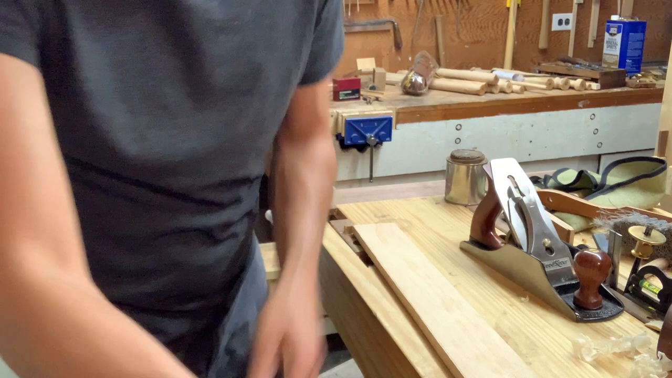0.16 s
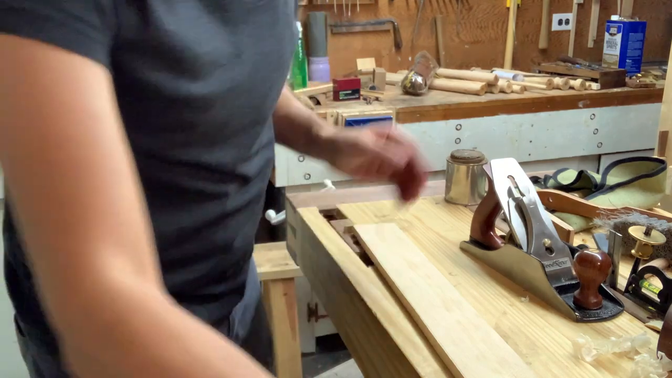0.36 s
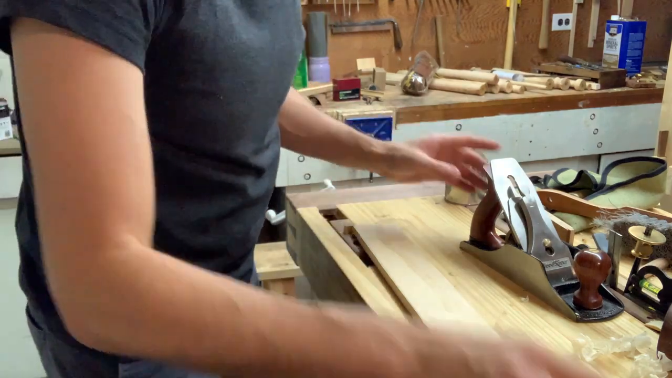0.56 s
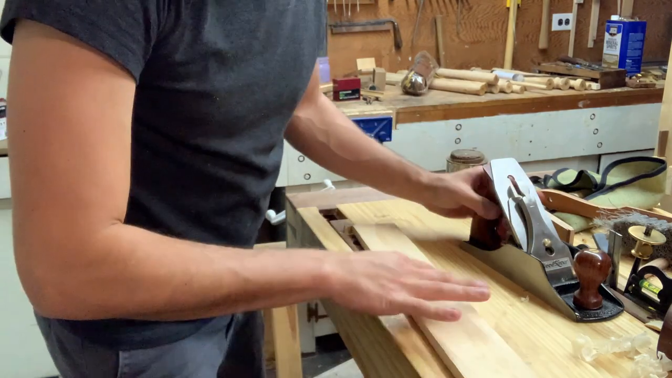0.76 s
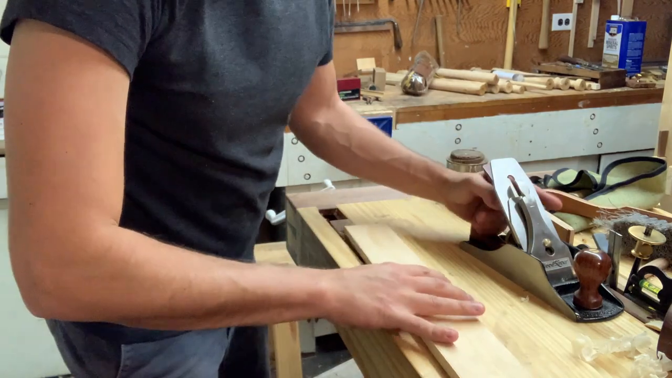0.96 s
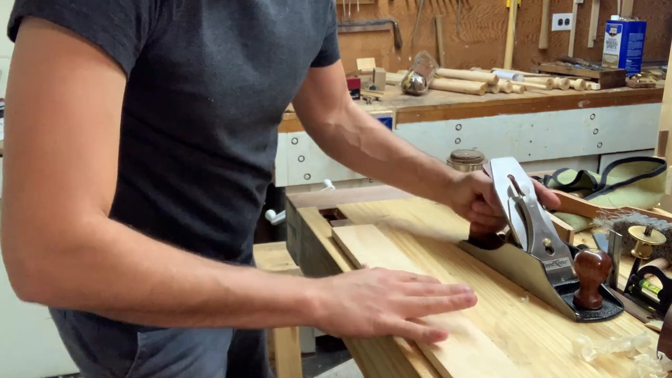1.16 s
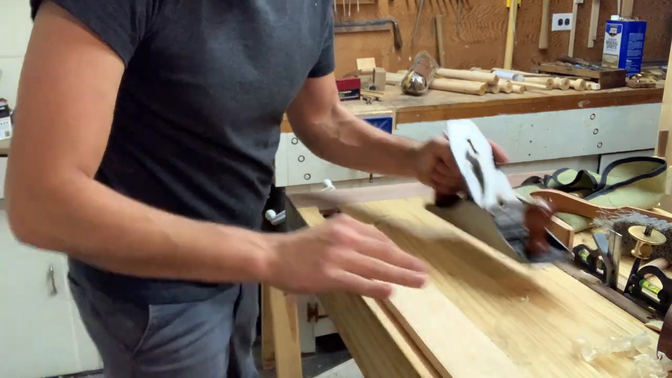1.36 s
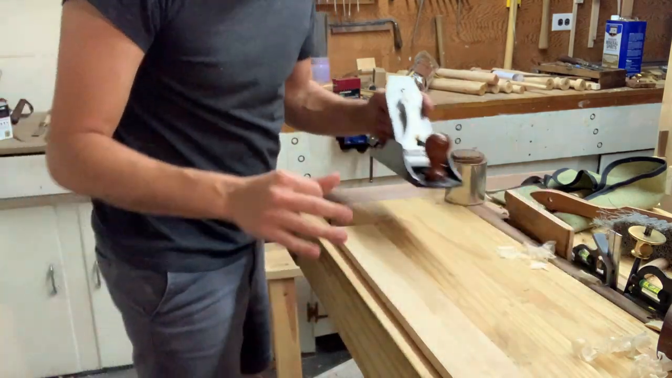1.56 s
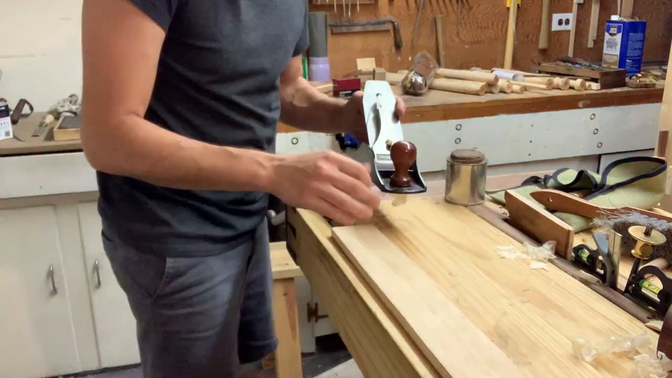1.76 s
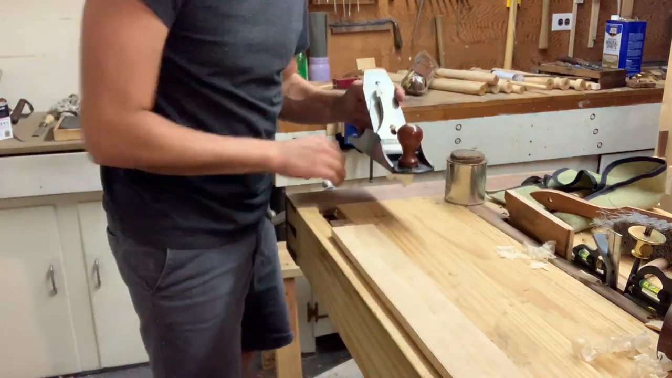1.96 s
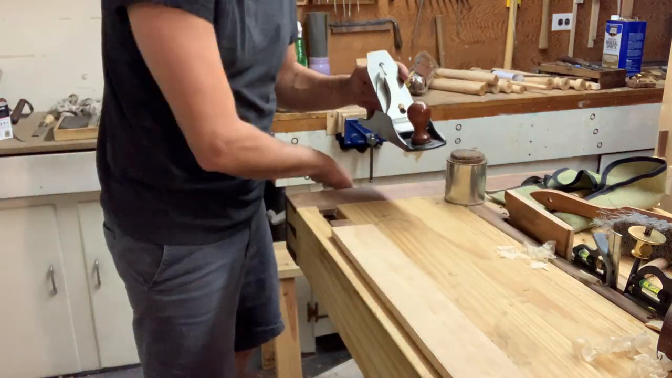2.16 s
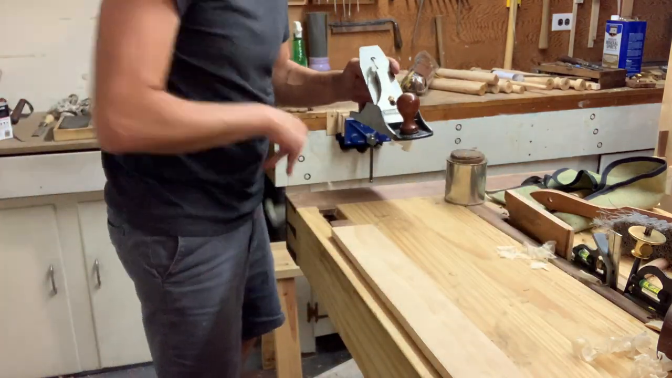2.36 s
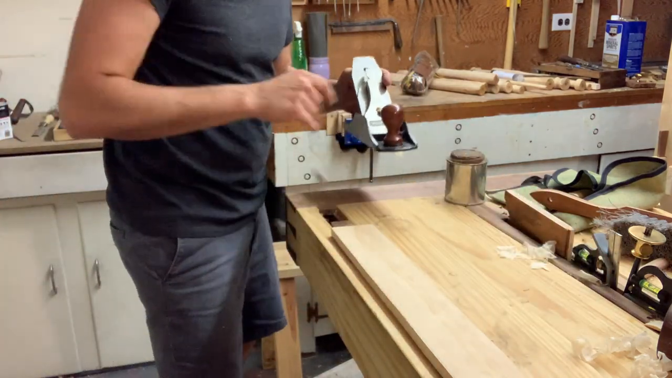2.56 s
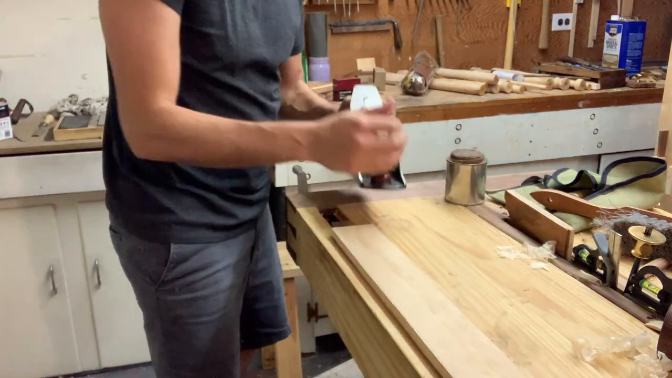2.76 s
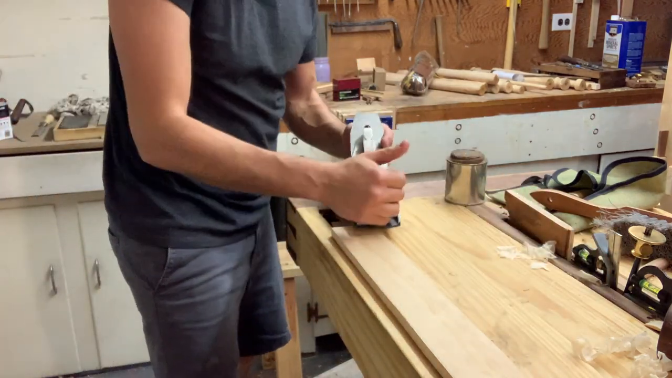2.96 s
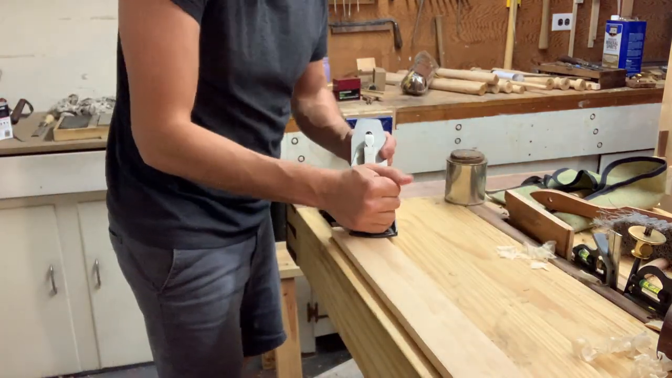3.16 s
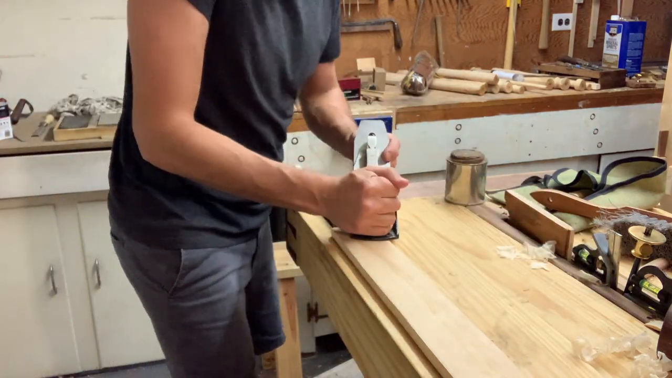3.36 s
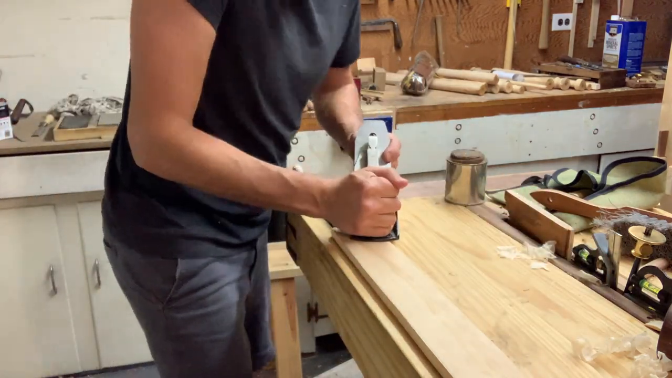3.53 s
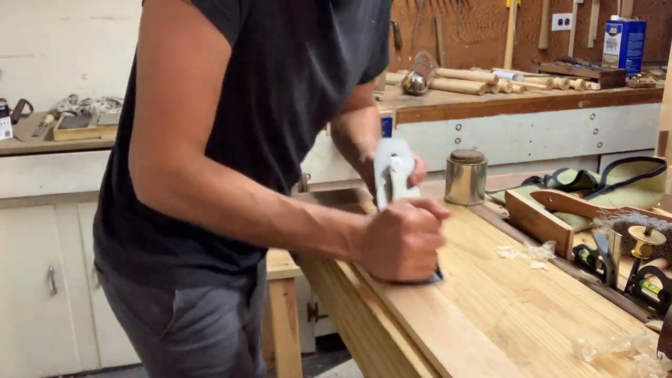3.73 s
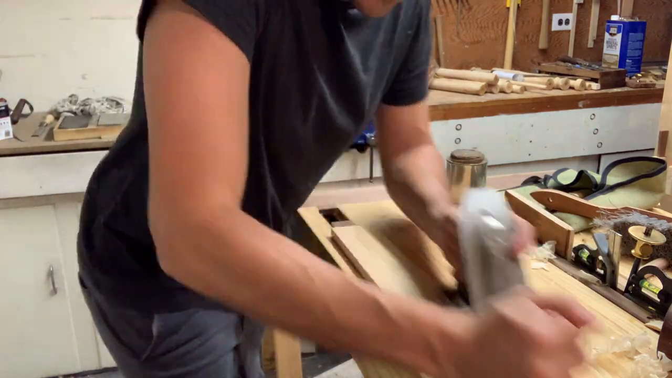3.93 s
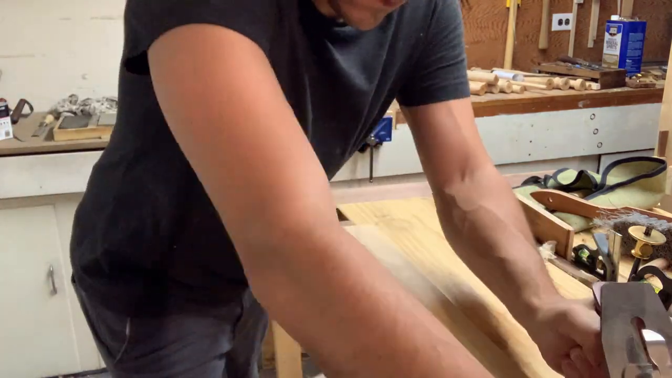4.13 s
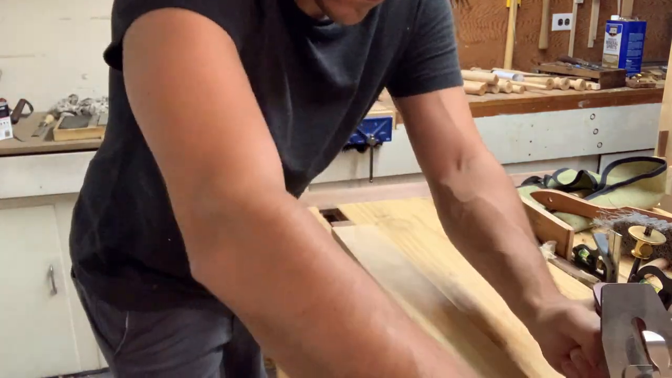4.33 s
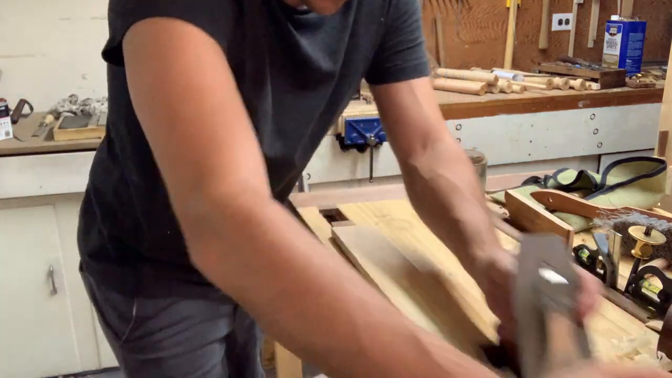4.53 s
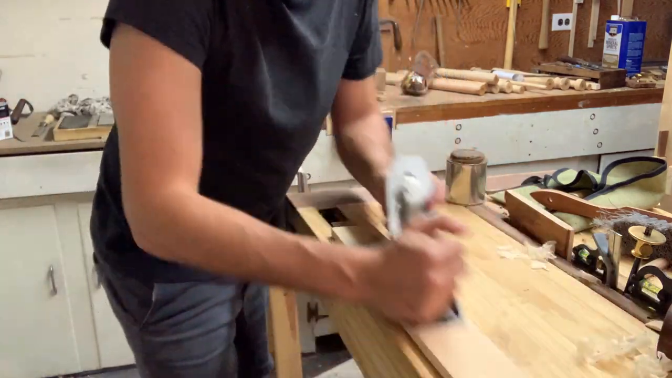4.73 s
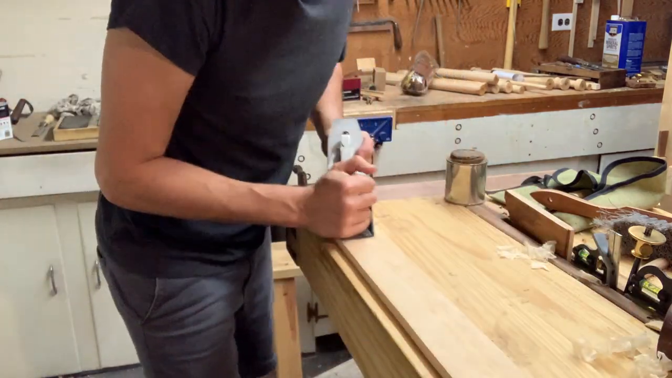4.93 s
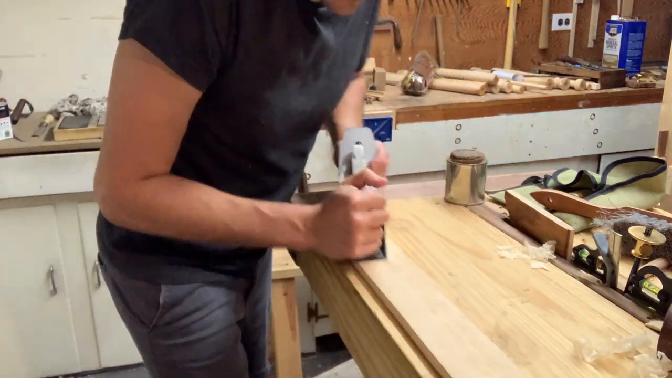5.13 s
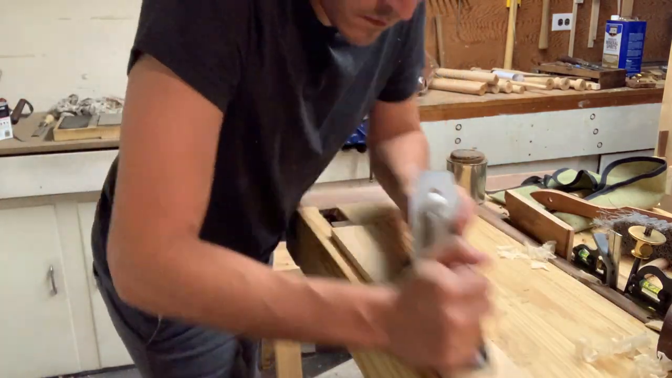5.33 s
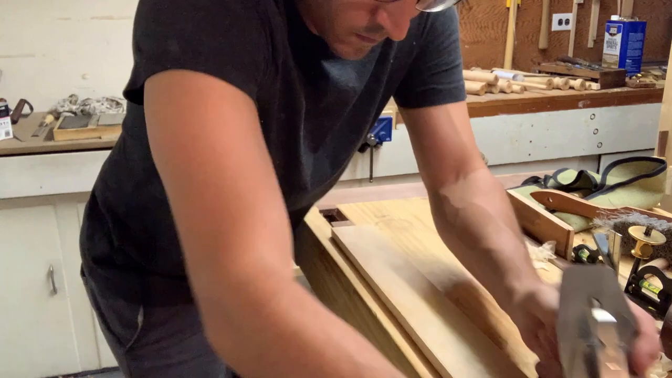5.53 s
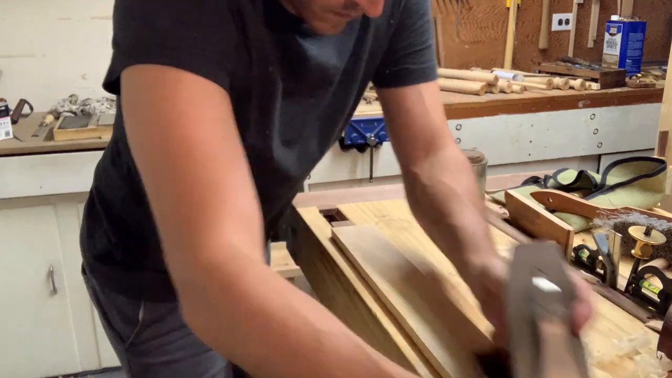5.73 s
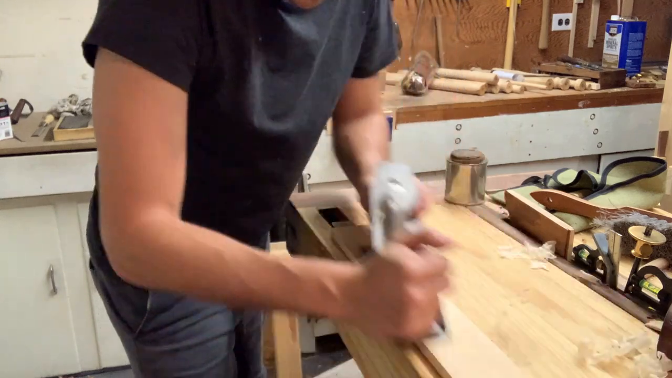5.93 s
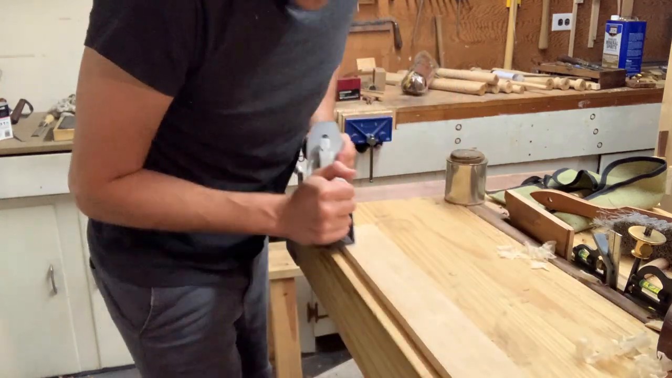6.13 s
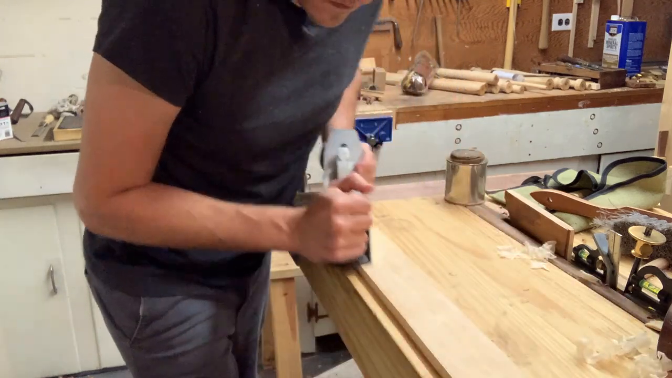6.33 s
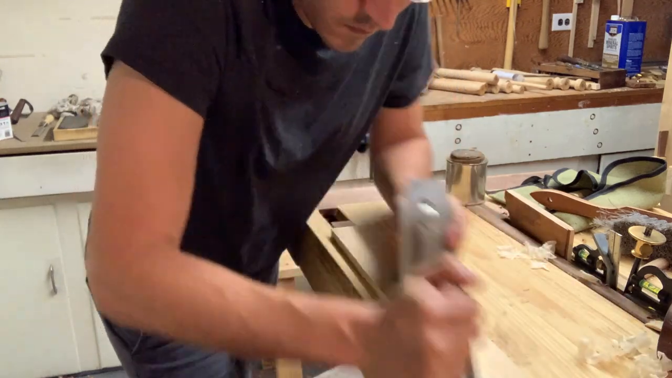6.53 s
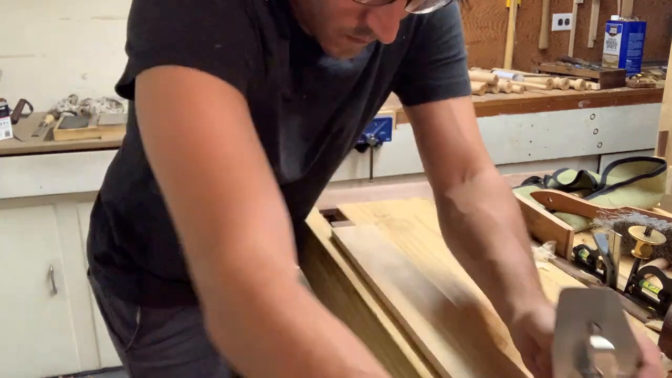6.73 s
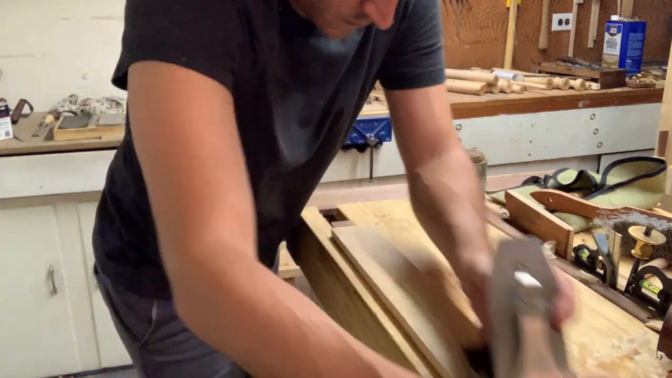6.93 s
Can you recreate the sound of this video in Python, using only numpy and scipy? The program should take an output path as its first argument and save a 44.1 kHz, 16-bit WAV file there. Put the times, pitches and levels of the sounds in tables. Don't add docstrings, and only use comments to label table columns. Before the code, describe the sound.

A close stereo pickup in a woodworking shop with a short echo, soft bassy air and a very faint far motor hum. From 0.3 to 0.5 s small bright steel ticks and light hand brushes; faint dull rubs near 0.9 and 1.2, then a stronger wipe at 1.5-1.7. Around 2.25-2.65 loose timber clatters in a dense run of woody knocks, heaviest near 2.4 with a low thump. At 3.02 a hard dry palm slap, the loudest moment. The blade touches wood at 3.45, then a long gritty, hissing push runs 3.6-4.1, ending in a thump. A scraping drag back, 4.5-4.9, carries a sharp metallic click at 4.63. A second push at 5.1-5.5 and a louder, brighter drag at 5.7-6.1 follow. At 6.3 the bench knocks and a sinking thud leads the third push to 6.65; the last drag starts at 6.9, with a bench thump near 7.0.

```python
import sys
import numpy as np
from scipy import signal
from scipy.fft import rfft, irfft, next_fast_len
from scipy.io import wavfile
from scipy.ndimage import uniform_filter1d, map_coordinates

SR = 44100
rng = np.random.default_rng(int(sys.argv[2]) if len(sys.argv) > 2 else 0)


def invert_db(level):
    return 10 ** (np.asarray(level, dtype=float) / 20)


def inscribe(sig):
    pcm = np.round(np.clip(np.atleast_2d(sig).T, -1, 1) * 32767)
    wavfile.write(sys.argv[1], SR, pcm.astype(np.int16))


N = 312669

# start in seconds, peak level in dB, tilt towards the bass in dB
# per octave, time to die by 60 dB in seconds, pitch of the struck spot in Hz.
TIMBER_BLOWS = [(2.264, -28.5, 0.5, 0.055, 600), (2.271, -33, -4, 0.0244, 1110),
                (2.277, -30, 4.5, 0.039, 425), (2.289, -30, 7, 0.059, 360), (2.346, -32, 1, .015, 1900),
                (2.359, -27, 5, 0.0136, 1800), (2.327, -31, 1.5, 0.026, 780),
                (2.357, -24.5, -4, 0.056, 350), (2.366, -17.5, 2, 0.0175, 330),
                (2.371, -23.5, 1.5, 0.0128, 176), (2.381, -18.5, -3, 0.0136, 489),
                (2.387, -27, -5, .015, 2600), (2.407, -32, 3, 0.0193, 950),
                (2.418, -30.5, 4.5, 0.045, 177.3), (2.428, -29.5, 1.5, .03, 963),
                (2.398, -21, 1.5, 0.0153, 330), (2.438, -33.5, 1.5, 0.069, 964), (2.46, -34, 1, .04, 330),
                (2.495, -33, 3, 0.035, 330), (2.524, -38, 0.5, 0.036, 676),
                (2.578, -25, 3.5, 0.0111, 514.5), (2.586, -35, 2, 0.012, 1335), (2.603, -32, 6, 0.017, 520),
                (2.642, -35, -0.5, 0.0233, 1800), (2.652, -27, 4.5, 0.0127, 672),
                (2.716, -41, 5.5, .02, 199), (2.739, -47, 3.5, 0.011, 1400), (3.053, -27, 3, 0.0213, 694),
                (3.075, -30.5, 0.5, 0.0334, 955)]
PALM_BLOWS = [
    (3.009, -42, 0, 0.091, 1200),
    (3.0159, -10, 2, 0.0044, 900),
    (3.0189, -6.5, 1, 0.0039, 1190),
    (3.0213, -13, 1, 0.0149, 2070),
    (3.027, -23.5, 4, 0.08, 2070),
]
STEEL_TICKS = [(.283, -54.5, 6.5, 0.0098, 10000), (.3045, -31.5, 2, 0.0056, 9500),
               (.3085, -37, 3, 0.0102, 6000), (.4372, -35.5, 4.5, 0.009, 11200),
               (.438, -28.5, 8, 0.0128, 4800), (2.2635, -50, 0, 0.16, 11000),
               (2.357, -40, 8.5, 0.087, 9500), (.4885, -49, -15.5, .003, 10000),
               (.497, -23, 3, 0.0054, 11300), (.5045, -46, 3, 0.005, 11460),
               (4.4045, -31.5, 1, 0.0031, 11900), (4.6275, -23, -1, 0.218, 11200),
               (4.6276, -12, -6, 0.007, 11800), (5.724, -49, 9.5, .02, 4000),
               (6.92, -45.5, 4.5, 0.008, 4000)]
BENCH_KNOCKS = [(.443, -36.5, -10, 0.044, 1430), (.447, -36, -8, 0.0246, 880),
                (.5, -42.5, -13.5, 0.054, 2550), (2.066, -48, -2, 0.044, 1470),
                (3.024, -27.5, -1, 0.062, 333.4), (4.046, -35.5, 5.5, 0.0111, 330),
                (4.278, -38, -5, 0.024, 1900), (4.284, -40.5, -0.5, 0.132, 900),
                (6.3, -29.5, -3, 0.014, 1300), (6.305, -27.5, -5.5, 0.0337, 680),
                (6.303, -34, 1, 0.02, 300), (6.345, -33.5, 10.5, 0.0217, 132), (6.372, -33, 13, 0.0324, 81),
                (6.312, -32, -2, 0.02, 620), (6.322, -32, 5.5, 0.0218, 239.8),
                (7.014, -41, 11.5, 0.052, 330)]

# pitch in Hz, width in Hz, level in dB.
CASTING_NOTES = [(800, 12, 12), (2070, 180, -1), (2620, 110, 2), (3020, 89, 1), (3400, 100, -9.5),
                 (3870, 120, -7), (4600, 120, -2)]
PALM_NOTES = [(213, 75, -14), (790, 130, -3.5), (1076, 120, -3), (1400, 270, -9), (1800, 360, -3),
              (2070, 110, 3.5), (2600, 250, -9), (3300, 1100, -10), (6434, 2300, -12.5)]
TIMBER_NOTES = [(166.6, 69, -3), (332.9, 44, -4), (509.1, 45, -4), (658.7, 70, 1), (941, 67, 1),
                (1335, 44, -4), (1900, 370, -7.5), (3000, 210, -25.5), (4330, 1400, -25),
                (7400, 3100, -26.5)]
BENCH_NOTES = [(81, 14, -6), (148.4, 20, -0.5), (196.75, 21.5, 4.5), (330, 34, -7), (465.2, 160, -8.5),
               (800, 250, -13), (1600, 230, -23.5)]

# frequency in Hz, level in dB per Hz.
BOARD_COLOUR = [(200, -13), (400, -6.5), (800, -3), (1500, -3), (2200, -6.5), (4000, -65.5)]
RASP_COLOUR = [(800, -65.5), (1500, -2), (2500, -1), (3500, 0), (4700, 0.5), (6000, -2.5), (7500, -1.5),
               (10000, -43)]
FIZZ_COLOUR = [(3000, -40), (4800, -8), (6200, -1), (8000, 0), (10000, -1), (11500, -3), (12500, -5),
               (14300, -9), (15000, -17), (15700, -27)]
TICK_COLOUR = [(300, -37), (1000, -27), (4000, -8.5), (7500, -2.5), (8700, 1), (9700, 0.5), (11000, -8),
               (12400, 1), (13600, -14.5), (15500, -27)]
CRACK_COLOUR = [(30, -72), (200, -34.5), (500, -21.5), (1500, -23), (4000, -32.5), (8000, -42),
                (11000, -42.5), (16000, -48.5)]
AIR_COLOUR = [(20, -19), (40, -2.5), (70, -5.5), (150, -4.5), (300, -12.5), (600, -19), (1200, -28.5),
              (2200, -34), (3500, -47.5), (8000, -46.5), (15000, -53.5)]

# pitch in Hz, rms level in dB.
MACHINE_HUM = [(118.4, -57.5), (177.6, -63), (242.2, -64.5)]
# frequency in Hz, time to die by 60 dB in seconds.
SHOP_ECHO = [(150, 0.502), (700, 0.467), (2000, 0.329), (5000, 0.361), (12000, 0.298)]
# frequency in Hz, likeness (1 is the same).
PORT_LIKENESS = [(30, .97), (70, .93), (150, .72), (300, .55), (600, .05), (1100, .2), (2200, .6),
                 (4000, .25), (6500, .55), (7500, .95), (9200, .97), (10300, .8), (11500, .985),
                 (13300, .98), (14300, .7), (15200, .95)]
# frequency in Hz, phase in radians.
PORT_LEAD = [(200, 0), (600, .9), (1800, .2), (2800, .5), (4500, 1.3), (7000, 2.4), (7800, 3), (9000, 3.4),
             (10400, 4.8), (11400, 6.1), (13400, 6.5), (14400, 7.9), (15100, 9.4)]
# frequency in Hz, left minus right in dB.
PORT_BALANCE = [(70, -4), (200, -4.5), (500, -0.5), (1000, -0.5), (15000, 1.5)]

# middle in seconds, length in seconds, pitch in Hz, level in dB.
CASTING_SONGS = [(3.648, 0.028, 3000, -49.5), (3.737, .06, 1600, -50), (4.736, 0.43, 820, -61),
                 (5.142, 0.19, 790, -59.5), (5.49, 0.04, 4650, -51), (5.761, 0.101, 3907, -52),
                 (5.786, 0.069, 4600, -46), (6.062, 0.035, 4300, -52), (6.097, 0.087, 4544, -55.5),
                 (6.275, 0.0596, 800, -52), (5.19, 0.03, 2950, -52), (.3, 0.204, 1600, -72.5),
                 (0.891, 0.045, 3300, -64), (0.889, 0.045, 4020, -66), (0.971, 0.078, 3400, -61.5),
                 (0.964, 0.069, 3960, -61), (2.555, 0.044, 2945, -56), (6.325, 0.041, 2890, -58.5),
                 (2.746, 0.047, 1464, -61), (3.776, .12, 3300, -50.5), (3.88, 0.1, 3030, -52.5),
                 (6.405, 0.213, 2920, -53.5)]
BITE_BANDS = [1800, 2600, 3600, 5000]

# start in seconds, hold in seconds, rasp level in dB,
# level of fizz beside the rasp in dB, brightest band in Hz.
HAND_BRUSHES = [
    (.305, 0.0135, -61.5, 8.5, 3360),
    (.44, 0.064, -59.5, -26.5, 2200),
    (.335, 0.039, -74, 7.5, 3000),
    (.868, 0.035, -62.5, -27.5, 3300),
    (.94, 0.04, -60.5, -29, 3500),
    (1.165, 0.0326, -69.5, 2.5, 2620),
    (1.28, 0.0172, -67.5, -14, 2460),
    (1.515, 0.15, -60, -5.5, 2400),
    (1.65, 0.061, -49.5, -6, 2510),
    (2.07, 0.0243, -65, -27, 2200),
]
SOFT_RUSTLES = [(.25, 0.48, -75, -26.5, 2380), (.8, .75, -74.5, -9.5, 2400), (1.02, 0.115, -75, -20, 3200),
                (1.75, 0.34, -66.5, -26.5, 3000), (3.42, .03, -80, -14, 2600), (4.2, 0.4, -75, -20.5, 2000),
                (4.9, .8, -70.5, -14.5, 2730), (6.2, 0.115, -69, -26, 2400), (6.8, 0.112, -67, 0.5, 3100),
                (5.675, 0.033, -72, 2.5, 3000)]
PLANE_PUSHES = [
    (2.235, .02, -69, -24, 3000),
    (3.445, 0.096, -62.5, -14, 2660),
    (3.55, 0.051, -57, -12.5, 2900),
    (3.62, 0.4439, -50, -0.5, 2920),
    (4.39, 0.105, -63, 0.5, 3220),
    (5.095, .385, -50.5, 2, 3010),
    (6.27, 0.041, -55, -12, 2370),
    (6.35, 0.29, -50.5, 1.5, 2840),
]
PLANE_PULLS = [
    (4.51, 0.411, -53.5, -2, 3000),
    (5.724, 0.3998, -47.5, -5, 3770),
    (6.921, .2, -51, -2.5, 3650),
]
# middle in seconds, extra rasp in dB, half length in seconds.
BLADE_CATCHES = [(3.815, 7, 0.16), (3.986, 9, 0.093), (3.995, 4, .008), (5.905, 3, .01), (4.551, 4, 0.0323),
                 (4.691, 6.5, 0.082), (4.824, 7.5, 0.0584), (5.197, 10, 0.0303), (5.322, 12, 0.061),
                 (5.493, 11, 0.053), (5.803, 4, 0.088), (5.923, 4.5, 0.0797), (6.056, 5.5, 0.041),
                 (6.508, 5.5, 0.132), (6.635, 7.5, 0.0484), (6.946, 2.5, 0.061), (7.09, 9, 0.078)]

# time in seconds, level in dB, time to lose 20 dB in seconds.
FLOOR_SWAYS = [(.08, -47.5, 0.13), (.89, -39.5, 0.2464), (1.4, -54, 0.48), (2.11, -49, 0.43),
               (2.33, -45, 0.31), (2.42, -44, 0.19), (3.06, -44.5, 0.24), (3.44, -40.5, 0.06),
               (3.7, -48.5, 0.24), (4.29, -44.5, 0.22), (4.68, -43.5, 0.1331), (4.87, -42.5, 0.04),
               (5.38, -50.5, 0.29), (5.7, -46, 0.1), (5.92, -40.5, 0.01), (6.12, -47.5, 0.26),
               (6.22, -41, 0.02), (6.39, -32.5, 0.07), (6.75, -58.5, 0.42), (6.95, -46.5, 0.1)]
BENCH_THUMPS = [(2.3, -55, 0.144), (2.41, -28.5, 0.089), (2.71, -39.5, 0.083), (3.06, -36, 0.0624),
                (3.97, -38, 0.075), (4.06, -28.5, 0.0586), (4.31, -50, .12), (4.53, -49, 0.053),
                (4.7, -39.5, 0.13), (5.42, -40.5, 0.172), (5.93, -39, 0.09976), (6.33, -31, 0.03),
                (6.55, -46, 0.093), (6.63, -37, 0.073), (6.79, -39.5, 0.056), (6.935, -38.5, 0.036),
                (7.03, -30.5, 0.066)]
# time in seconds, pitch in Hz, level in dB.
BENCH_ROCKING = [(6.3, 300, -60), (6.308, 290, -40), (6.32, 250, -38), (6.328, 215, -30), (6.336, 205, -38),
                 (6.343, 180, -30), (6.356, 125, -38), (6.375, 95, -55)]

STEP = 64


def unit(x):
    return x / np.sqrt(np.mean(x ** 2) + 1e-20)


def along(points, hz):
    f, v = np.transpose(points)
    return np.interp(np.log(hz + 1), np.log(f + 1), v)


def slow():
    return np.arange(0, N + STEP, STEP) / SR


def spread(control):
    return np.interp(np.arange(N) / SR, slow(), control)


def wobble(rate):
    knots = rng.standard_normal(int(N * rate / SR) + 4)
    return spread(map_coordinates(knots, [slow() * rate]))


def filtered(x, response):
    m = 2 * next_fast_len(x.shape[-1] // 2 + 4096)
    return irfft(rfft(x, m) * response(np.fft.rfftfreq(m, 1 / SR)), m)[..., :x.shape[-1]]


def colour(spectrum):
    return lambda hz: invert_db(along(spectrum, hz))


def modes(peaks):
    def response(f):
        total = 0
        for k, (centre, width, db) in enumerate(peaks):
            damping = 1j * f * width
            total = total + (-1) ** k * invert_db(db) * damping / (centre * centre - f * f + damping)
        return total
    return response


def causal(gain):
    def response(hz):
        cepstrum = irfft(np.log(np.abs(gain(hz)) + 1e-6))
        cepstrum[1:len(hz) - 1] *= 2
        cepstrum[len(hz):] = 0
        return np.exp(rfft(cepstrum))
    return response


def two_noises(response):
    return unit(filtered(rng.standard_normal((2, N)), response))


def shop(x, wet_db, delay=.006):
    hz, t, z = signal.stft(rng.standard_normal((2, SR // 2)), SR, nperseg=256)
    fading = invert_db(-60 * t / along(SHOP_ECHO, hz)[:, None])
    tail = signal.istft(z * fading, SR, nperseg=256)[1]
    late = np.pad(x * np.ones((2, 1)), ((0, 0), (int(delay * SR), 0)))
    echo = signal.fftconvolve(late, tail / np.linalg.norm(tail[0]), axes=1)[:, :x.shape[-1]]
    return x + invert_db(wet_db) * echo


def swell(start, hold, rise, fall):
    t = slow()
    before = np.clip(start - t, 0, None)
    after = np.clip(t - start - hold, 0, None)
    return invert_db(-rise * before - fall * after)


def loads(table, rise):
    return spread(sum(invert_db(db) * swell(s, 0, 20 / (rise * fade), 20 / fade) for s, db, fade in table))


def machine_hum():
    t = np.arange(N) / SR
    hum = 0
    for hz, db in MACHINE_HUM:
        level = invert_db(db + 1.0 + 1.1 * wobble(8.3))
        apart = np.array([wobble(4), wobble(2.0)])
        hum = hum + level * np.sin(2 * np.pi * hz * t + 0.45 * wobble(9) + .5 * apart)
    return hum


def room_air():
    return invert_db(-54.5 + 1.2 * wobble(2.965)) * two_noises(colour(AIR_COLOUR))


def floor_sway():
    level = invert_db(-56) + loads(FLOOR_SWAYS, rise=0.58)
    return invert_db(-3.0) * level * two_noises(lambda hz: modes([(68, 30, 0)])(hz) ** 2)


def bench_top():
    planing = np.arange(N) / SR >= 3.3
    level = invert_db(np.where(planing, -61.5, -75)) + loads(BENCH_THUMPS, rise=0.87)
    return invert_db(-6.0) * level * two_noises(lambda hz: modes([(205, 35, 0)])(hz) ** 2)


def blows(table, body, wet_db, hit, focus_db, rise_s=1e-4, lag=0):
    out = np.zeros((2, N + SR))
    t = np.arange(SR // 2) / SR
    for s, db, tilt_db, t60, spot_hz in table:
        force = rng.standard_normal(len(t)) * invert_db(-60 * t / t60)
        force *= 1 - np.exp(-t / rise_s)
        force[0] += hit

        def struck(hz):
            nearness = np.exp(-(np.log2((hz + 1) / spot_hz) / 0.2126) ** 2)
            tilt = tilt_db * np.log2((hz + 150) / 1500)
            return body(hz) * invert_db(focus_db * nearness - tilt)

        sound = filtered(force, causal(struck))
        out[:, round(s * SR):][:, :len(t)] += shop(invert_db(db) * sound / np.abs(sound).max(), wet_db)
    return np.array([np.roll(out[0], round(lag)), out[1]])[:, :N]


def crisp(peaks, crack_db, soft_hz):
    def gain(hz):
        ringing = sum(np.abs(modes([peak])(hz)) ** 4 for peak in peaks) ** .5
        crack = invert_db(crack_db) * colour(CRACK_COLOUR)(hz)
        return np.sqrt(ringing + crack ** 2) / (1 + (hz / soft_hz) ** 3)
    return gain


def bench_knocks():
    body = crisp(BENCH_NOTES, crack_db=4.5, soft_hz=2200)
    return blows(BENCH_KNOCKS, body, wet_db=1, hit=6.65, focus_db=6.5)


def steel_ticks():
    return blows(STEEL_TICKS, colour(TICK_COLOUR), wet_db=-12, hit=4.4, focus_db=7.5)


def timber_clatter():
    body = crisp(TIMBER_NOTES, crack_db=12.0, soft_hz=7000)
    return blows(TIMBER_BLOWS, body, wet_db=0.0, hit=1.5, focus_db=10.5, rise_s=0.00104, lag=9.16)


def palm_slap():
    body = crisp(PALM_NOTES, crack_db=-1.5, soft_hz=5550)
    return blows(PALM_BLOWS, body, wet_db=-5.0, hit=5.3, focus_db=-4.5) * invert_db([[.8], [-.8]])


def bench_rocking():
    s, hz, db = np.transpose(BENCH_ROCKING)
    t = np.arange(N) / SR
    note = np.sin(2 * np.pi * np.cumsum(np.interp(t, s, hz)) / SR)
    return shop(invert_db(np.interp(t, s, db, -120, -120)) * note, wet_db=-8)


def rubbing_contacts():
    t = slow()
    catch_db = sum(db * np.clip(1 - np.abs(t - s) / half, 0, 1) for s, db, half in BLADE_CATCHES)
    rasp, board, fizz, bite = np.full((4, len(t)), 1e-9)
    kinds = ((HAND_BRUSHES, 800.5, 252, -7.5, 1.7),
             (SOFT_RUSTLES, 112, 380, 3.32, 1.094),
             (PLANE_PUSHES, 403, 187, -4, 0.83),
             (PLANE_PULLS, 2499.5, 257.5, -10, 1.5))
    for table, rise, fall, board_db, faster in kinds:
        for s, hold, db, fizz_db, hz in table:
            touch = swell(s, hold, rise, fall)
            gain = invert_db(db) * touch
            rasp = rasp + gain
            board = board + invert_db(board_db) * gain
            fizz = fizz + invert_db(db + fizz_db) * touch ** faster
            bite = bite + hz * gain
    bite_hz = bite / rasp * 2 ** (.03 * catch_db)
    return map(spread, (rasp * invert_db(catch_db), board * invert_db(.3 * catch_db), fizz * invert_db(.35 * catch_db), bite_hz))


def scratch(grit_db, patchy_db):
    grains = rng.standard_normal((2, N)) * invert_db(grit_db * rng.exponential(size=N))
    z = signal.stft(grains, nperseg=512)[2]
    field = uniform_filter1d(rng.standard_normal(z.shape[1:]), size=2, axis=0)
    field = uniform_filter1d(field, size=7, axis=1)
    return signal.istft(z * invert_db(patchy_db * unit(field)), nperseg=512)[1][:, :N]


def casting_song(grit):
    song, t = np.zeros((2, N)), np.arange(N) / SR
    slides = .035 * rng.normal(-.7, 1, len(CASTING_SONGS))
    for (s, length, hz, db), slide in zip(CASTING_SONGS, slides):
        near = slice(int((s - length) * SR), int((s + length) * SR))
        since = t[near] - s
        tone = unit(filtered(grit[:, near], lambda f: modes([(hz, 60 + .03 * hz, 0)])(f) ** 2))
        drift = np.exp(1j * np.pi * slide * hz / length * since ** 2)
        tone = np.real(signal.hilbert(tone) * drift)
        song[:, near] += invert_db(db) * np.exp(-(2 * since / length) ** 4) * tone
    return song


def blade_rasp(bite_hz):
    fibres = filtered(scratch(grit_db=1.52, patchy_db=3.5), colour(RASP_COLOUR))
    place = np.interp(np.log(bite_hz), np.log(BITE_BANDS), np.arange(len(BITE_BANDS)))
    bite = 0
    for k, hz in enumerate(BITE_BANDS):
        share = np.clip(1 - np.abs(place - k), 0, 1) ** .5
        bite = bite + share * unit(filtered(fibres, modes([(hz, 0.427 * hz, 0)])))
    return invert_db(-3) * unit(fibres) + invert_db(-6) * bite


def plane_and_hands():
    rasp_gain, board_gain, fizz_gain, bite_hz = rubbing_contacts()
    shake = invert_db(1.304 * wobble(30))
    rasp = blade_rasp(bite_hz)
    fizz = invert_db(4.5) * unit(filtered(scratch(grit_db=1.9862, patchy_db=4.0), colour(FIZZ_COLOUR)))
    board = unit(filtered(scratch(grit_db=1.11, patchy_db=3.0), colour(BOARD_COLOUR)))
    grit = scratch(grit_db=3.5, patchy_db=5.0)
    ring = invert_db(-14.0) * unit(filtered(grit, modes(CASTING_NOTES)))
    rubbing = shake * (rasp_gain * (rasp + ring) + fizz_gain * fizz + board_gain * board)
    return shop(rubbing + casting_song(grit), wet_db=-7)


def scene():
    background = machine_hum() + room_air() + floor_sway() + bench_top()
    struck = bench_knocks() + steel_ticks() + timber_clatter() + palm_slap()
    return background + struck + bench_rocking() + plane_and_hands()


def roll_off(x):
    return signal.sosfilt(signal.butter(12, 15600, fs=SR, output="sos"), x)


def record(dry):
    turn = lambda hz: np.arccos(np.clip(along(PORT_LIKENESS, hz), -1, 1)) / 2
    pair = np.array([dry[0] + dry[1], dry[0] - dry[1]]) / np.sqrt(2)
    mid, side = filtered(pair, lambda hz: np.array([np.cos(turn(hz)), np.sin(turn(hz))]))
    half = np.array([[.5], [-.5]])

    def port_response(hz):
        return invert_db(half * along(PORT_BALANCE, hz)) * np.exp(-1j * half * along(PORT_LEAD, hz))

    ports = filtered(np.array([mid + side, mid - side]), port_response)
    return roll_off(ports)


dry = scene()
out = record(dry)
inscribe(out)
```